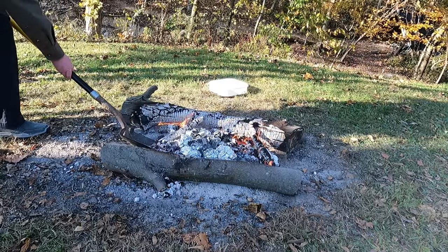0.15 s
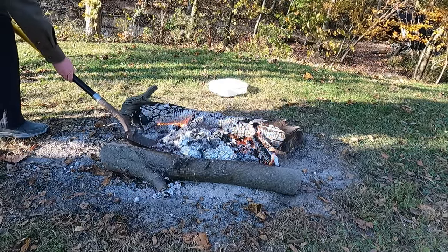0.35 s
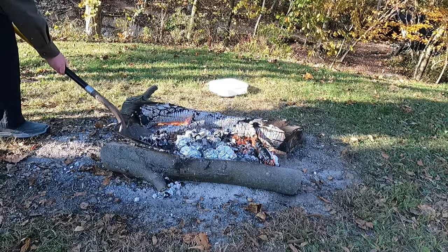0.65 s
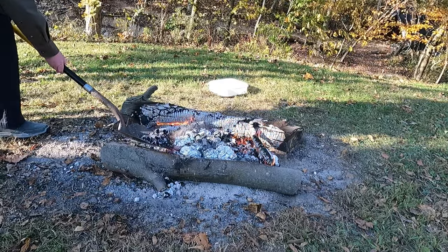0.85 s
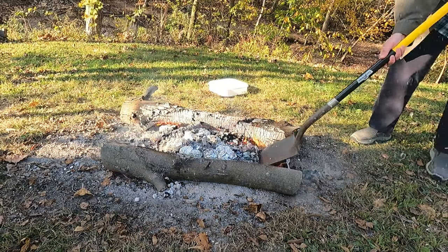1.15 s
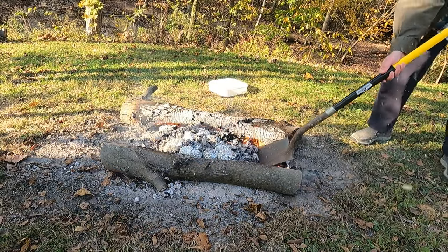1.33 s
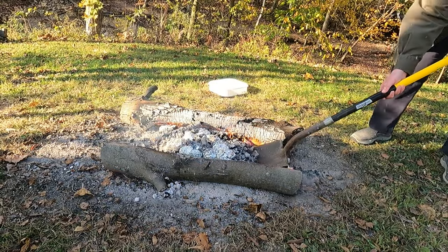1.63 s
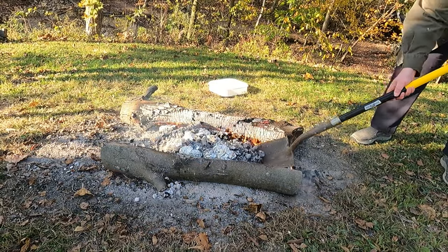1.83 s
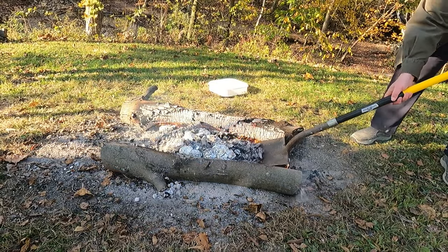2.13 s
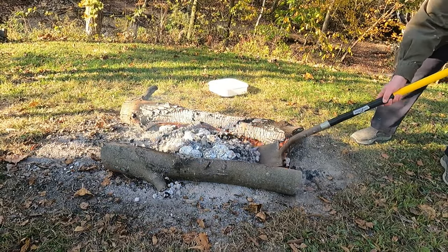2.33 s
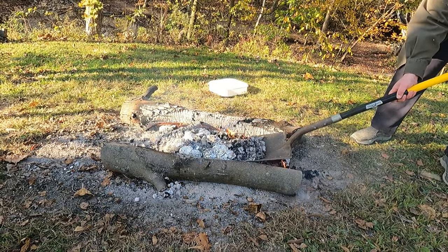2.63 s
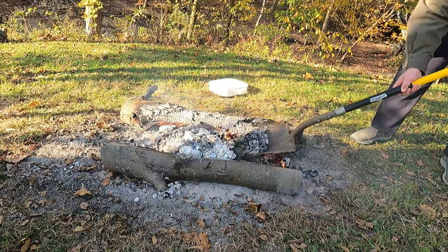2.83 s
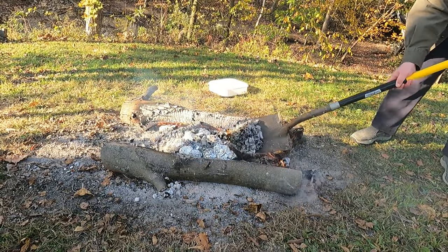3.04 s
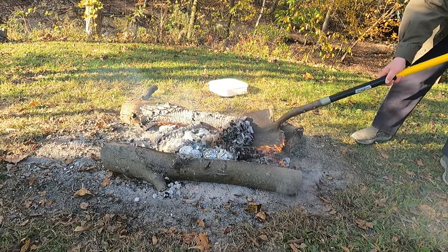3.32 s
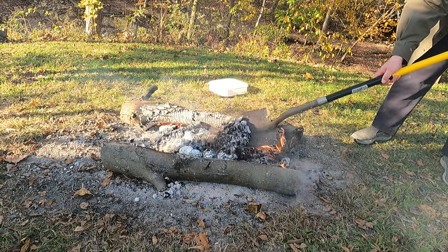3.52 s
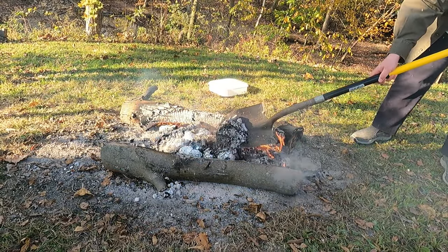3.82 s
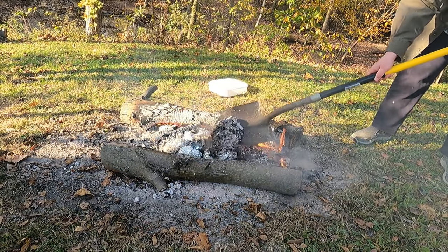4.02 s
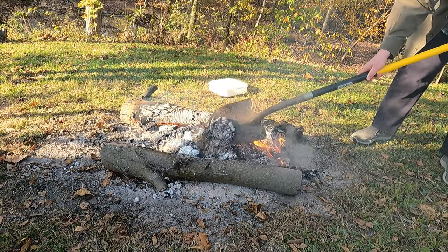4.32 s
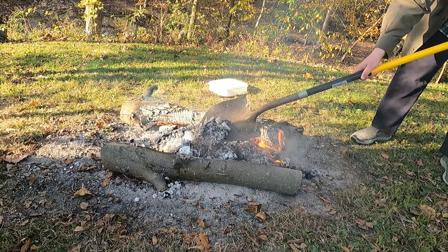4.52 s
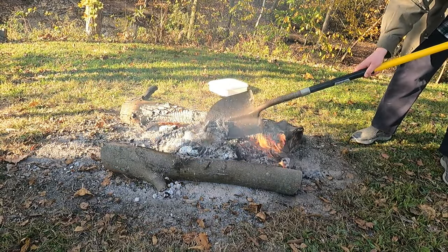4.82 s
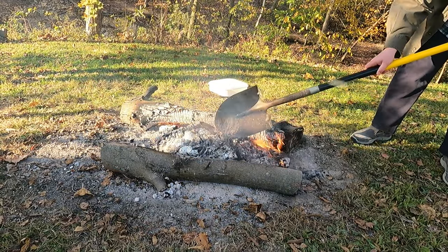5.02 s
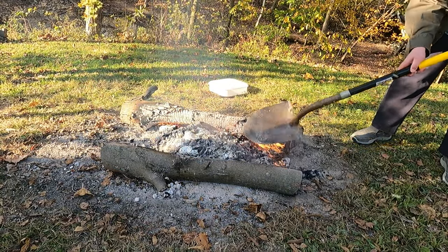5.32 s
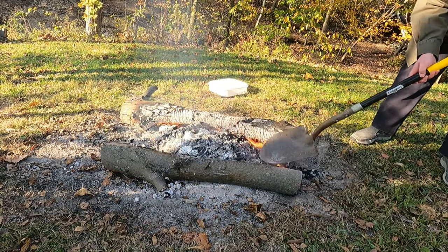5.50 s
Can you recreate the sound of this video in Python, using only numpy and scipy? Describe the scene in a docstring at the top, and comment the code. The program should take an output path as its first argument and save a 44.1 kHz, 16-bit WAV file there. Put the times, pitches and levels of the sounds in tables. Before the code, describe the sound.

A steel shovel clanks and scrapes through fire pit coals in gusty wind, then a second shovel heaves charcoal over with dense brittle snapping and crumbling.

```python
"""Shovels in a fire pit.

Two steel shovels, one after the other, work the coals: grit and lumps excite the modes of each blade.
The first clanks and scrapes while wind buffets the microphone; the second digs in, then heaves a charred
log over. Charcoal crumbles and snaps as clustered fractures; the fire hisses as coloured noise underneath."""
import sys
import numpy as np
from scipy import signal
from scipy.fft import rfft, irfft
from scipy.io import wavfile
from scipy.ndimage import uniform_filter1d

SR = 44100
rng = np.random.default_rng(int(sys.argv[2]) if len(sys.argv) > 2 else 0)


def put_to_file(sound):
    """Save the sound as 16-bit audio at rate SR, in the file named by the first command-line argument."""
    columns = np.atleast_2d(sound).T  # one column per channel
    safe = np.clip(columns, -1, 1)
    whole_steps = np.round(safe * 32767)
    wavfile.write(sys.argv[1], SR, whole_steps.astype(np.int16))


N = 249606
TIME = np.arange(N) / SR


def amp(db):
    """Logarithmic level: decibels to amplitude gain."""
    return 10 ** (np.asarray(db) / 20)


def unit_rms(x):
    """Power normalisation: scales to a mean power of one."""
    return x / np.sqrt(np.mean(x ** 2) + 1e-20)


def unit_energy(x):
    """Energy normalisation: scales to a summed power of one."""
    return x / np.sqrt(np.sum(x ** 2, -1, keepdims=True) + 1e-20)


def read(points, hz):
    """Spectral interpolation: reads a curve on a log-frequency axis."""
    f, value = np.transpose(points)
    return np.interp(np.log(hz + 1), np.log(f + 1), value)


def level(rows):
    """Amplitude envelope: gain over time from rows of (t/s, level/dB); silent outside them."""
    return amp(np.interp(TIME, *np.transpose(rows), left=-np.inf, right=-np.inf))


def add(mix, s, sound):
    """Superposition: mixes a sound in at a time."""
    part = mix[..., max(round(s * SR), 0):][..., :sound.shape[-1]]
    part += sound[..., :part.shape[-1]]


def through(x, response):
    """Linear system: convolves with an impulse response."""
    return signal.fftconvolve(x, response)[:len(x)]


def click(points, size=1024):
    """Minimum phase: a causal click of unit energy with the given spectrum."""
    log_gain = np.log(amp(read(points, abs(np.fft.fftfreq(size, 1 / SR)))))
    spectrum = np.exp(np.conj(signal.hilbert(log_gain)))
    return unit_energy(np.fft.ifft(spectrum).real)


def band(x, hz, kind, order=2):
    """Band limiting by a Butterworth filter."""
    edges = np.clip(hz, 10, SR / 2 - 100)
    return signal.sosfilt(signal.butter(order, edges, kind, fs=SR, output="sos"), x)


def drift(top_hz):
    """Slow random fluctuation: noise of unit RMS limited to frequencies below top_hz."""
    spectrum = rfft(rng.standard_normal(N))
    return unit_rms(irfft(spectrum * (np.fft.rfftfreq(N, 1 / SR) < top_hz), N))


def grains(per_s, spread_db, clump_db, clump_hz, largest=4):
    """Random point process: tiny fractures, many small and few large, coming in clumps."""
    size_db = spread_db * np.minimum(rng.exponential(1, N), largest)
    size = amp(size_db + clump_db * drift(clump_hz))
    return unit_rms(size * rng.choice([-1, 1], N) * (rng.random(N) < per_s / SR))


def noise_pair(colour, likeness):
    """Partial coherence: coloured noise, partly shared between left and right."""
    hz = np.fft.rfftfreq(N, 1 / SR)
    mid, side = rfft(rng.standard_normal((2, N))) * amp(read(colour, hz))
    same = np.clip(read(likeness, hz), 0, 1)
    mid, side = mid * np.sqrt(1 + same), side * np.sqrt(1 - same)
    return unit_rms(irfft([mid + side, mid - side], N))


def shovel(modes, start_s, end_s, crunch_db, low_hz, scatter_db):
    """Forced vibration: one blade takes the strokes and knocks that fall in its turn."""
    strokes = [row for row in STROKES if start_s <= row[0] < end_s]
    lumps = [row for row in KNOCKS if start_s <= row[0] < end_s]
    return scrape(strokes, lumps, modes) + knocks(lumps, modes, crunch_db, low_hz, scatter_db)


# the blade is pushed through the coals: t/s, length/s, pressure level/dB, favoured ring f/Hz,
# ring level/dB re crunch, fizz level/dB re pressure, focus of the ring (1 broad, 2 nearly one note)
STROKES = [(0.02, 0.019, -37.5, 2600, 0, -29, 1), (0.064, 0.082, -39, 4300, -3.5, -25, 1),
           (0.445, 0.054, -41, 1580, -13, -20, 1), (1.18, 0.041, -41, 3900, 18, -12, 0.89),
           (1.231, 0.105, -45.5, 2680, 3.5, -7.5, 1), (1.64, 0.17, -43.5, 1620, -11, -17, 0.75),
           (1.955, 0.025, -46.5, 1600, 0, -26, 1), (2.034, 0.074, -43.5, 4300, -4, -3, 0.81),
           (2.37, 0.052, -39, 1050, -4.5, -9.5, 0.91), (4.595, 0.11, -55.5, 2000, -2, -22, 1)]
# colour of a slip on grit: f/Hz, level/dB
GRIT = [(100,-15),(300,8),(550,-6),(750,1),(1000,4.5),(1700,5),(2800,0.5),(4500,2),(6500,0.5),(10000,-4),(12000,-19),(15000,-30)]
BITE_S, LIFT_S = 0.02, 0.018  # the pressure builds before a stroke and dies after it, time constants
SURGE_DB, DRAG_S = -13.5, 0.013  # a struck lump drags under the edge: re knock level, time constant


def scrape(strokes, lumps, modes):
    """Slip excitation: the edge slips over grit, crunching, ringing the blade and fizzing on hard cinders."""
    slips = grains(per_s=5000, spread_db=3.1, clump_db=2.9, clump_hz=150)
    cinders = grains(per_s=5000, spread_db=3.2, clump_db=2.5, clump_hz=180)
    fizz = unit_rms(band(through(cinders, click(GRIT)), 9200, "highpass"))
    surge = sum(amp(db + SURGE_DB) * np.exp(-abs(TIME - s) / DRAG_S) * (TIME > s) for s, db, *_ in lumps)
    out = np.zeros(N)
    for s, length_s, db, favoured_hz, ring_db, fizz_db, focus in strokes:
        before, after = np.maximum(s - TIME, 0), np.maximum(TIME - s - length_s, 0)
        contact = np.exp(-before / BITE_S - after / LIFT_S)
        pressure = contact * (amp(db) + surge)
        crunch = through(pressure * slips, click(GRIT))
        ring = travelling_ring(pressure * slips, modes, favoured_hz, focus)
        body = (crunch + amp(ring_db) * ring) / np.hypot(1, amp(ring_db))
        out += body + amp(fizz_db) * pressure * fizz
    return out


CONTACTS_PER_S = 53  # how often a new part of the edge takes the load


def travelling_ring(slips, modes, favoured_hz, focus, count=4, buried_t60=0.1):
    """Moving excitation point: crossfaded contacts ring changing blends of modes; coals damp the longest."""
    out = np.zeros(N)
    damped = [(hz, db, min(t60, buried_t60)) for hz, db, t60 in modes]
    for k in range(count):
        away = abs((TIME * CONTACTS_PER_S - k) % count - count / 2)
        load = np.cos(np.pi / 2 * np.minimum(away, 1))
        ring = blade_ring(damped, favoured_hz, focus, scatter_db=3, detune=.006)
        out += through(slips * load, ring)
    return out


# modes of each blade when free of the coals: f/Hz, level/dB before favouring and scatter, t60/s
FIRST_BLADE = [(785,-14,.09),(930,-12,.13),(1145,-6,.08),(1235,-9,.045),(1298,-8.5,.07),(1562,-4,.09),(1622,-13,.1),(1865,-19,.24),(1950,-19,.09),(2083,-4.5,.15),(2217,-10,.11),(2365,-9,.085),(2471,-16,.28),(2697,-24,.2),(2930,-17,.06),(3283,-4,.09),(3526,-16,.16),(3700,-15,.05),(3898,-8,.058),(4000,-19,.28),(4110,-14,.06),(4230,-13,.05),(4390,-8,.058),(4687,-16,.15),(5310,-23,.13),(5520,-17,.11),(5830,-18,.06),(6013,-16,.1),(6250,-21,.13),(6700,-20,.09)]
SECOND_BLADE = [(405,-13,.09),(955,-12,.12),(1040,-16,.1),(1125,-12,.1),(1290,-19,.07),(1545,-6,.11),(1610,-5.5,.09),(1672,-9,.07),(1855,-11,.12),(2085,-11,.08),(2205,-9,.1),(2450,-11,.15),(2680,-14,.1),(2920,-14,.09),(3190,-10,.05),(3340,-8,.06),(3440,-12,.07),(3800,-12,.06),(3930,-11,.06),(4070,-10,.08),(4240,-10,.07),(4390,-10,.07),(4680,-9,.06),(4810,-12,.06),(4920,-12,.07),(5300,-10,.07),(5820,-12,.07),(6090,-12,.1),(6220,-11,.07),(7160,-14,.07),(7660,-15,.08)]


def blade_ring(modes, favoured_hz, focus, scatter_db, detune, favour_db=7, octaves=0.38):
    """Modal superposition: neighbouring modes start in opposite phase; the contact favours some.

    More focus favours fewer modes, more strongly; chance scatters their levels and bends their pitch."""
    t, ring = TIME[:SR // 3], 0
    chance = np.clip(rng.standard_normal((len(modes), 2)), -2, 2)
    for k, ((hz, db, t60), (loud, bend)) in enumerate(zip(modes, chance)):
        distance = focus * np.log2(hz / favoured_hz) / octaves
        boost_db = focus * favour_db * np.exp(-distance ** 2) + scatter_db * loud
        tone = np.sin(2 * np.pi * hz * (1 + detune * bend) * t)
        ring = ring + (-1) ** k * amp(db + boost_db - 60 * t / t60) * tone
    return unit_energy(ring)


# the blade strikes a lump: t/s, level/dB over a hundredth of a second, crushing time constant/s,
# dull above f/Hz, favoured ring f/Hz, focus of the ring (1 broad, 2 nearly one note)
KNOCKS = [(0.0155, -43, 0.0037, 7000, 4570, 1), (0.028, -39, 0.0078, 4500, 2680, 1.1),
          (0.062, -43, .003, 7500, 3900, 1), (0.072, -33.5, 0.0027, 8000, 1590, 1.5),
          (0.0925, -32.5, 0.005, 6000, 2560, 1.8), (0.104, -36, .004, 4000, 2500, 2),
          (0.112, -38, .003, 10000, 6500, 1.3), (0.135, -33.5, 0.011, 9900, 6700, 1.5),
          (0.1522, -26.5, 0.0052, 2550, 1190, 0.8), (0.1544, -15, 0.00067, 6000, 1170, 1.2),
          (0.1575, -29.5, 0.0059, 5000, 3580, 0.72), (0.458, -29.5, 0.009, 9800, 5600, 1.6),
          (0.474, -28, 0.0033, 4170, 1420, 1.9), (1.18, -33.5, 0.0045, 7100, 3900, 1),
          (1.232, -32, 0.0051, 7500, 4380, 0.93), (1.2447, -29, 0.0017, 4470, 3250, 1.3),
          (1.282, -36, 0.0062, 8000, 3600, 0.92), (1.2926, -31, 0.0067, 9100, 5000, 1.3),
          (1.296, -29.5, 0.0034, 4500, 1900, 1), (1.302, -34, 0.0017, 6000, 2250, 1.8),
          (1.322, -33, 0.0049, 4970, 3000, 1.2), (1.3924, -33.5, 0.005, 4970, 3280, 1.4),
          (1.395, -30, 0.0014, 3000, 1640, 1.5), (1.942, -41.5, 0.0087, 5530, 1610, 1.1),
          (2.012, -42, .001, 2500, 2020, 1.1), (2.0208, -34, 0.0026, 6000, 1900, 0.75),
          (2.039, -25, 0.0036, 4500, 1920, 0.76), (2.041, -32, 0.0026, 6000, 4270, 1.6),
          (2.048, -32, 0.012, 9000, 5000, 1.3), (2.054, -34.5, .003, 11000, 6000, 1.1),
          (2.069, -35.5, 0.011, 7000, 2420, 2), (2.075, -32, .005, 7000, 5230, 1.4),
          (2.097, -39, 0.0033, 9000, 3800, 1), (2.123, -42.5, 0.0054, 9000, 5030, 0.82),
          (2.371, -29.5, 0.0063, 7040, 1830, 2.4), (2.387, -31.5, 0.0024, 7000, 1050, 1.5),
          (2.396, -38, 0.0026, 8040, 4800, 1), (2.414, -40, 0.0057, 9900, 5000, 1),
          (2.867, -50.5, 0.0031, 1300, 950, 4.5), (3.796, -42, 0.0045, 2200, 960, 0.76),
          (5.084, -43.5, 0.0064, 3500, 1690, 2)]
CRUNCH_S = 0.0074  # lumps that take longer than this to crush give more crunch, harder ones a cleaner ring


def knocks(rows, modes, crunch_db, low_hz, scatter_db):
    """Impact excitation: a lump gives way in milliseconds while the ring builds up."""
    out, t, grit = np.zeros(N), TIME[:SR // 3], click(GRIT)
    for s, db, crush_s, dull_hz, favoured_hz, focus in rows:
        force = np.exp(-t / crush_s)
        free_ring = blade_ring(modes, favoured_hz, focus, scatter_db, detune=.002)
        ring = unit_energy(free_ring * (1 - force ** 2))
        crunch = unit_energy(through(force * rng.standard_normal(len(t)), grit))
        sound = ring + amp(crunch_db) * crush_s / CRUNCH_S * crunch
        sound = band(band(sound, dull_hz, "lowpass"), low_hz, "highpass", order=3)
        add(out, s, amp(db) * np.sqrt(SR // 100) * unit_energy(sound))
    return out


# a coal or the log rubs along the blade: t/s, length/s, f/Hz, level/dB, RMS pitch waver/Hz
SQUEALS = [(0.072, 0.078, 2365, -46, 40), (1.247, 0.036, 2205, -38, 25), (1.361, 0.032, 1590, -50, 35),
           (1.948, 0.062, 1615, -54, 40), (2.085, 0.045, 1620, -50, 40), (2.39, 0.04, 1592, -50, 30),
           (3.87, 0.38, 4010, -62.5, 80), (4.008, 0.05, 2345, -55, 10), (4.01, 0.07, 2448, -58, 10),
           (4.118, 0.07, 2455, -51, 15), (4.194, .07, 2455, -60, 15), (4.84, 0.17, 1705, -59, 50),
           (5.0, 0.13, 1695, -56.5, 35)]


def squeals(catch_s=0.0031, fade_db=-6):
    """Stick-slip oscillation: the blade sings one rough, unsteady note that catches quickly and fades."""
    out = np.zeros(N)
    waver, rough = drift(200), unit_rms(amp(3 * drift(120)))
    for s, length_s, hz, db, waver_hz in SQUEALS:
        phase = 2 * np.pi * np.cumsum(hz + waver_hz * waver) / SR
        tone = unit_rms(np.sin(phase)) * rough
        note = tone[int(s * SR):int((s + length_s) * SR)]
        t = TIME[:len(note)]
        ends = np.clip(np.minimum(t, length_s - t) / catch_s, 0, 1)
        shape = ends * amp(fade_db * t / length_s)
        add(out, s, amp(db) * note * unit_rms(shape))
    return out


# the shove carries into logs and ground: t/s, peak level/dB, f/Hz
THUDS = [(0.14, -39, 380), (0.468, -43, 390), (1.391, -37, 330), (1.941, -37, 380), (2.037, -31, 260),
         (2.066, -37, 180), (2.068, -29, 440), (5.652, -27, 800)]
THUD_S = 0.012  # the push is strongest at half this time


def thuds():
    """Structure-borne impact: short woody bumps of band-limited noise under the hardest shoves."""
    out, t = np.zeros(N), TIME[:SR // 5]
    for s, db, hz in THUDS:
        push = rng.standard_normal(len(t)) * t * np.exp(-2 * t / THUD_S)
        bump = band(push, [hz * .6, hz * 1.25], "bandpass")
        add(out, s, amp(db) * bump / abs(bump).max())
    return out


# the log rolls over the ash: t/s, length/s, level/dB before its ends are faded
ROLLS = [(3.422, 0.51, -72), (4.695, 0.55, -58.5)]


def rolls(low_hz=260, high_hz=560):
    """Rolling contact noise: the heavy log grinds dully on the ash as it turns."""
    rubs = grains(per_s=1500, spread_db=3, clump_db=2, clump_hz=40)
    grind = unit_rms(band(rubs, [low_hz, high_hz], "bandpass"))
    out = np.zeros(N)
    for s, length_s, db in ROLLS:
        turn = grind[int(s * SR):int((s + length_s) * SR)]
        add(out, s, amp(db) * turn * signal.windows.tukey(len(turn), .5))
    return out


# the loudest coals snap: t/s, energy level/dB, f/Hz, width/octaves, cracking time constant/s
SNAPS = [(0.363, -21, 7050, 0.6, 0.0017), (0.788, -23, 3600, 1.2, 0.0011), (0.8741, -19, 2630, 0.78, .0008),
         (2.178, -21.5, 4520, 0.91, .0007), (2.8503, -18, 5900, 2.3, 0.00032),
         (2.8944, -21, 4100, 2.8, 0.00076), (2.9464, -20, 2370, 2, 0.0015), (2.975, -26, 2490, 1.8, .001),
         (2.9939, -18, 4670, 3.2, 0.0012), (3.126, -15.5, 4500, 1.9, 0.0021),
         (3.2295, -21, 2600, 1.2, 0.00079), (3.246, -20, 6180, .6, .0008),
         (3.253, -15.5, 6660, 0.14, 0.00086), (3.2674, -18.5, 3860, 1.2, 0.0016),
         (3.27, -14.5, 4900, 1.2, 0.0017), (3.3005, -21.5, 6030, 1.1, 0.00073),
         (3.336, -20, 4850, 0.67, .001), (3.3509, -16, 4700, 0.48, .0008),
         (3.3792, -12, 5030, 0.77, 0.0018), (3.3951, -20, 3420, 0.51, .0007),
         (3.4115, -13, 3580, .9, 0.0056), (3.4445, -17.5, 5330, 0.97, .0015),
         (3.4607, -28, 3280, .8, .0008), (3.4742, -13.5, 4200, 0.59, 0.0029),
         (3.4818, -14, 4000, 1.5, 0.001), (3.5037, -14.5, 3500, 1, .0012), (3.532, -17, 3290, 0.24, .0005),
         (3.545, -29, 2980, 0.82, 0.00053), (3.5787, -14, 2700, 0.9, 0.0044),
         (3.5988, -5, 6150, 0.36, 0.00015), (3.6218, -16, 4150, 0.99, 0.00086),
         (3.6306, -21, 7150, 0.31, 0.00093), (3.64, -23, 4280, 1.7, .001), (3.6622, -15, 5090, 1.9, .001),
         (3.6696, -17, 3300, 1.3, .0012), (3.7235, -20, 4060, 1.3, .0015), (3.7388, -20.5, 4600, 1, 0.0012),
         (3.751, -19, 3660, .8, .0015), (3.9006, -18.5, 2870, 2.8, .001), (4.119, -16.5, 3300, 1.6, 0.0027),
         (4.153, -18.5, 3520, 1.1, 0.0011), (4.2129, -14.5, 3580, 2.1, 0.00049),
         (4.235, -17.5, 3580, 2.5, 0.00097), (4.3247, -15, 4100, 0.47, 0.00084),
         (4.4108, -19.5, 5070, 1.6, .0008), (4.558, -17.5, 6150, 2.5, 0.00089),
         (4.567, -18.5, 3700, 0.56, 0.0014), (4.5978, -19.5, 2070, 1.3, .0015),
         (4.606, -21, 3080, 1.1, 0.0011), (4.6323, -15.5, 6440, 0.34, .001),
         (4.6549, -16.5, 2700, 1.3, 0.0029), (4.701, -19, 2810, 1, 0.0013),
         (4.704, -15, 10200, 0.22, 0.00099), (4.7179, -16, 2460, 0.44, 0.0022),
         (4.739, -18, 4600, 0.78, 0.00092), (4.7505, -21, 3580, 1, .001), (4.8002, -21, 3700, 2, 0.0014),
         (4.9005, -19.5, 7150, 0.16, .001), (5.0853, -19, 2920, 0.78, 0.0023),
         (5.203, -15.5, 3150, 0.87, 0.0017)]


def snaps(splinter_db=-18, follow=0.63, trail_s=0.006, splinter_s=0.00021, splinter_octaves=0.92, count=3):
    """Brittle fracture: a coal splits, and a few splinters of other sizes break off just after it."""
    out, colour = np.zeros((2, N)), click(CHAR)
    for s, db, hz, octaves, crack_s in SNAPS + small_snaps():
        sides = amp(rng.uniform(-1.4, 1) * np.array([[1], [-1]]))  # random left-right balance
        add(out, s, sides * crack(colour, db, hz, octaves, crack_s))
        # each splinter: delay in trail times, pitch shift in octaves, level in dB
        for late, size, force in rng.uniform([.2, -.9, -4], [2, .6, 3], (count, 3)):
            loudness_db = splinter_db + follow * db + force
            splinter = crack(colour, loudness_db, hz * 2 ** size, splinter_octaves, splinter_s)
            add(out, s + late * trail_s, sides * splinter)
    return out


HEAVE_START_S, HEAVE_END_S = 2.8, 5.2  # the log is heaved over


def small_snaps(count=50, typical_db=-24, follow=0.048, typical_hz=3200, width_octaves=3.4, crack_s=0.0008):
    """Inhomogeneous point process: lesser snaps in the heave, thicker and louder in hard slides; as SNAPS."""
    slide = sliding() * (TIME > HEAVE_START_S) * (TIME < HEAVE_END_S)
    chance = np.cumsum(slide ** 2)
    places = (np.arange(count) + rng.random(count)) / count
    times = np.interp(places, chance / chance[-1], TIME)
    force_db = 20 * np.log10(np.interp(times, TIME, slide) / slide.max() + 1e-6)
    scatter = np.clip(rng.standard_normal((count, 2)), -2, 2) * [2, .35]  # in dB and octaves
    return [(s, typical_db + follow * db + loud, typical_hz * 2 ** high, width_octaves, crack_s)
            for s, db, (loud, high) in zip(times, force_db, scatter)]


def crack(colour, db, hz, octaves, crack_s):
    """Transient radiation: one brief decaying burst, pitched by the size of the piece."""
    t = TIME[:SR // 50]
    burst = through(rng.choice([-1, 1], len(t)) * np.exp(-t / crack_s), colour)
    edges = [hz * 2 ** (-octaves / 2), hz * 2 ** (octaves / 2)]
    return amp(db) * unit_energy(band(burst, edges, "bandpass", order=1))


# colour of breaking charcoal: f/Hz, level/dB
CHAR = [(200,3),(400,-0.5),(720,-3.5),(1300,2),(2000,1.5),(3000,-3),(6000,-3),(10000,-5),(12000,-18),(15000,-22)]


def crumble(count=12, low_hz=1400, high_hz=10500, cycles=0.81):
    """Granular emission: flakes of many sizes crack, each size at its pitch, in a rustle of fine ash."""
    t, flakes = TIME[:SR // 100], np.zeros(N)
    for hz in np.geomspace(low_hz, high_hz, count):
        flake = unit_energy(np.sin(2 * np.pi * hz * t) * np.exp(-t * hz / cycles))
        cracks = grains(per_s=260, spread_db=4, clump_db=1.9, clump_hz=80)
        flakes += np.sqrt(hz) * through(cracks, flake)
    times, _, _, coarseness = np.transpose(SLIDES)
    coarse = np.clip(np.interp(TIME, times, coarseness), 0, 1)
    ash = np.sqrt(1 - coarse ** 2) * rng.standard_normal(N)
    rustle = through(coarse * unit_rms(flakes) + ash, click(CHAR))
    settling = amp(1.9 * drift(110))
    return unit_rms(rustle * settling) * sliding()


# part of the heap gives way: t/s at its height, level/dB, swelling time constant/s,
# coarseness (0 fine ash, 1 flakes)
SLIDES = [(0.79, -44.5, 0.28, 0.71), (1.12, -45, 0.13, 0.65), (1.56, -49, 0.033, 0.78),
          (2.928, -52, .08, 0.48), (3.271, -49, .025, 0.49), (3.46, -44, .07, 0.65),
          (3.61, -42.5, .06, 0.74), (3.739, -48, .025, 0.56), (4.127, -49.5, .03, 0.65),
          (4.319, -52, .06, .8), (4.598, -46.5, .04, 0.91), (4.71, -48, .035, 1), (5.14, -51, .06, 1)]
SETTLE_RATIO = 1.4  # a slide takes this much longer to settle than to swell
RESTING_DB = -58  # crumbling of the undisturbed embers


def sliding():
    """Incoherent power sum: the gain of the breaking charcoal, slides swelling and settling over embers."""
    power = amp(RESTING_DB) ** 2
    for s, db, swell_s, _ in SLIDES:
        distance = np.maximum((s - TIME) / swell_s, (TIME - s) / (swell_s * SETTLE_RATIO))
        power = power + amp(db) ** 2 * np.exp(-2 * distance)
    return np.sqrt(power)


# colour of wind on the microphone: f/Hz, level/dB per Hz
WIND = [(10,-36),(20,-1),(36,6.5),(64,-1),(108,-9.5),(162,-13.5),(260,-26),(380,-35),(600,-37),(1200,-54)]
# gusts: t/s, level/dB before the lean to the right
GUSTS = [(0.0, -28.5), (0.03, -26), (0.074, -42), (0.2, -35), (0.24, -28.5), (0.28, -36), (0.324, -27.5),
         (0.41, -31), (0.472, -40), (0.524, -27), (0.592, -43.5), (0.64, -28.5), (0.7, -28), (0.75, -39.5),
         (0.86, -35.5), (0.92, -33.5), (0.988, -30), (1.01, -38), (1.06, -36), (1.148, -29.5), (1.16, -62),
         (1.21, -65), (1.3, -47), (1.33, -35), (1.355, -51), (1.395, -31.5), (1.44, -47), (1.6, -71),
         (2.72, -72), (2.84, -64), (3.1, -68), (3.28, -50.5), (3.5, -67), (4.08, -72), (4.2, -54),
         (4.42, -66), (4.55, -57), (4.75, -72)]


def wind():
    """Turbulent pressure noise: low lumpy buffeting, a little stronger on the right."""
    buffet = noise_pair(WIND, [(30, .85), (200, .45)])  # likeness of the sides at each frequency
    steady = buffet / np.sqrt(uniform_filter1d((buffet ** 2).mean(0), size=2000))
    lean_db = np.array([[-1.3], [1.3]])
    return steady * level(GUSTS) * amp(lean_db)


# colour of the fire bed: f/Hz, level/dB per Hz
HISS = [(18, -13), (30, -3.5), (55, 5.5), (113, -5.5), (185, 0), (337, -9.5), (620, -14.5), (837, -11),
        (1300, -7), (2840, -8.5), (3980, -7), (7430, -16.5), (9390, -22.5), (13500, -38.5), (15000, -79)]
# likeness of left and right in the hiss: f/Hz, likeness (0-1); the top is mono
LIKENESS = [(60,1),(200,0.92),(700,0.74),(4000,0.53),(8000,1),(15000,1)]


def fire_bed(level_db=-48.5):
    """Broadband noise: hiss of embers and dry leaves over a low rumble that swells with the breeze."""
    waver_db, breeze_db = .4 * drift(14), 2.3 * drift(7)
    bed = noise_pair(HISS, LIKENESS)
    rumble = signal.sosfiltfilt(signal.butter(2, 200, fs=SR, output="sos"), bed)
    hiss = bed - rumble
    return (hiss + rumble * unit_rms(amp(breeze_db))) * amp(level_db + waver_db)


def yard(x, wet_db=-11, t60=0.0027, far_db=-26, far_t60=1.0):
    """Scattering and reverberation: logs and ground scatter at once; the trees return a faint tail."""
    t = TIME[:SR // 2]
    near, far = rng.standard_normal((2, 2, len(t)))
    scattered = unit_energy(near * amp(-60 * t / t60) * (t > .001))
    trees = unit_energy(far * amp(-60 * t / far_t60) * (t > .02))
    tail = amp(wet_db) * scattered + amp(far_db) * trees
    return x + signal.fftconvolve(x, tail, axes=1)[:, :N]


HANDOVER_S = 1.16  # the second shovel takes over


def scene():
    """Superposition of sources: both shovels and the coals in the open air, with wind and fire bed."""
    first = shovel(FIRST_BLADE, 0, HANDOVER_S, crunch_db=3.0, low_hz=584, scatter_db=4.4)
    second = shovel(SECOND_BLADE, HANDOVER_S, N / SR, crunch_db=0.5, low_hz=360, scatter_db=4.0)
    blades = first + second + squeals()
    pit = thuds() + rolls() + crumble() + snaps()
    return yard(blades + pit) + wind() + fire_bed()


EDGE_HZ = 15300


def record(dry):
    """Band limitation: the recorder's low-pass, a symmetric linear-phase filter."""
    low_pass = signal.firwin(511, EDGE_HZ, window=("kaiser", 9), fs=SR)
    return signal.oaconvolve(dry, low_pass[None], "same", axes=1)


dry = scene()
out = record(dry)
put_to_file(out)
```